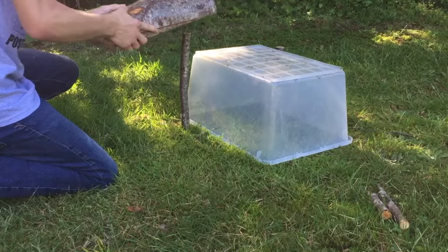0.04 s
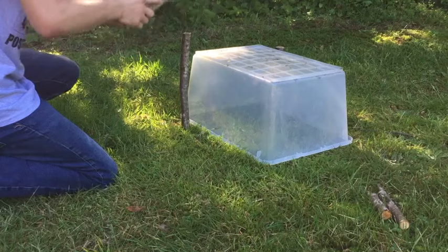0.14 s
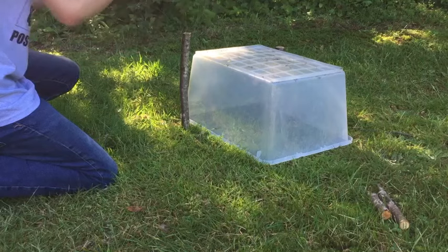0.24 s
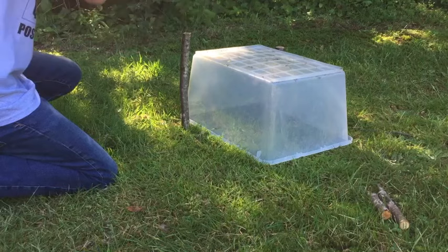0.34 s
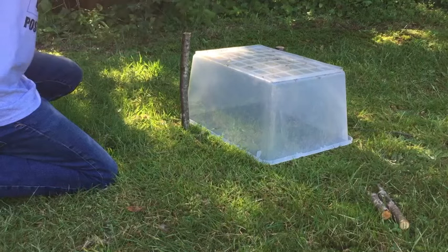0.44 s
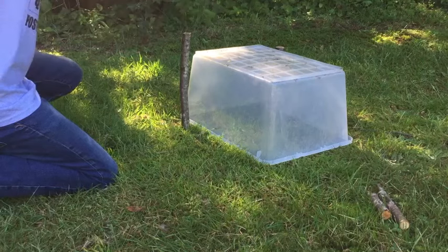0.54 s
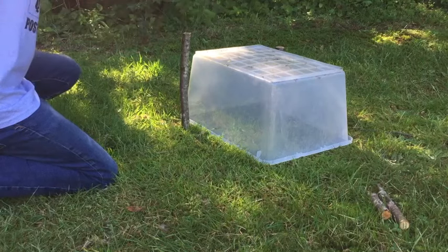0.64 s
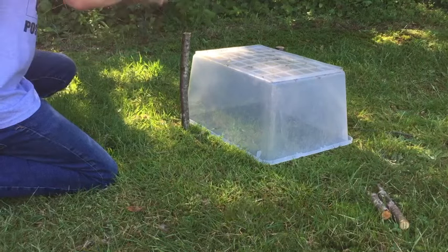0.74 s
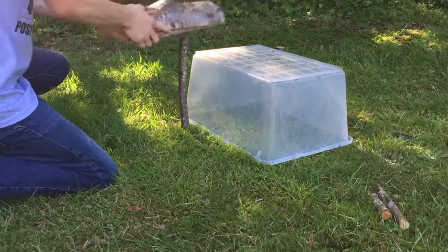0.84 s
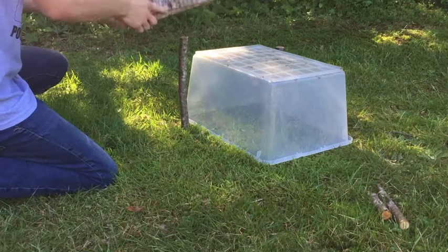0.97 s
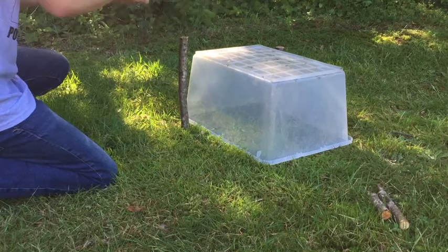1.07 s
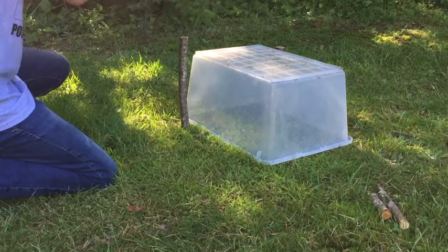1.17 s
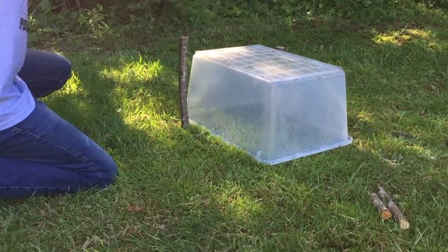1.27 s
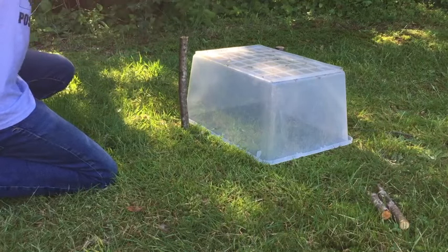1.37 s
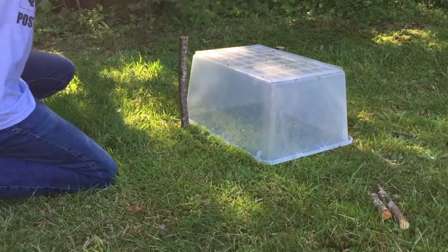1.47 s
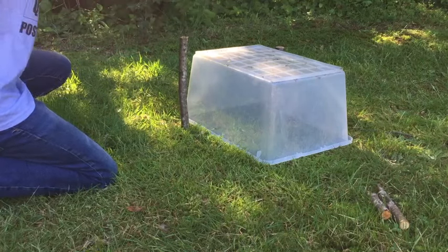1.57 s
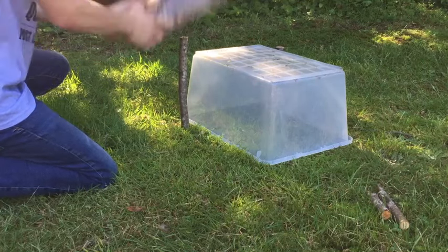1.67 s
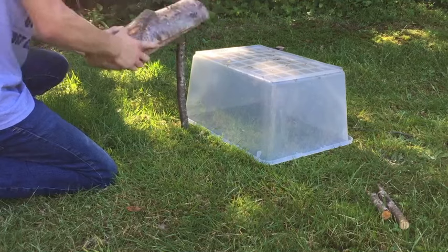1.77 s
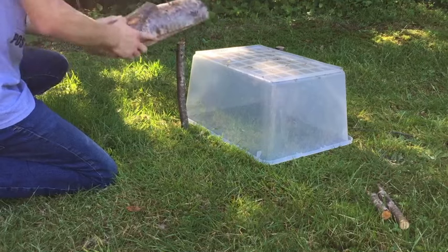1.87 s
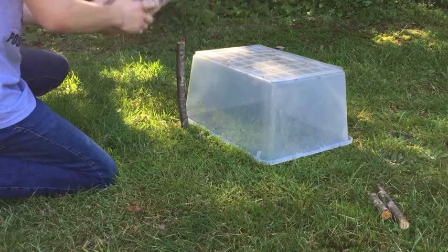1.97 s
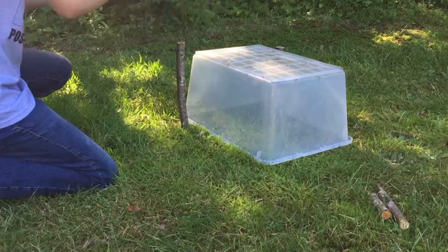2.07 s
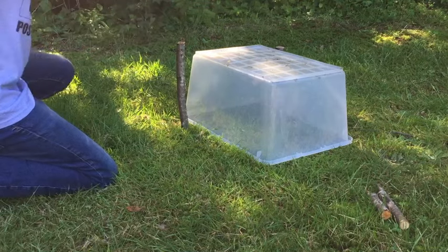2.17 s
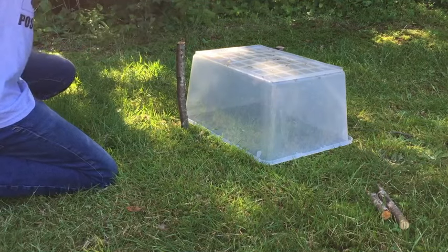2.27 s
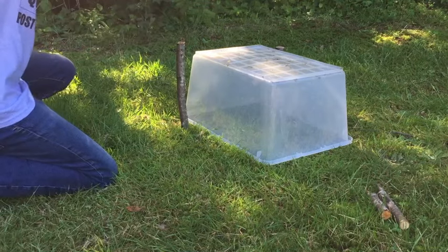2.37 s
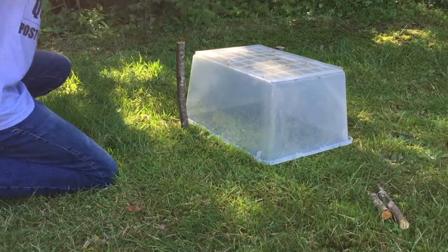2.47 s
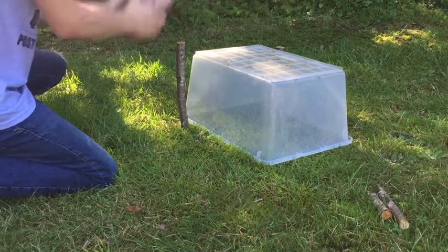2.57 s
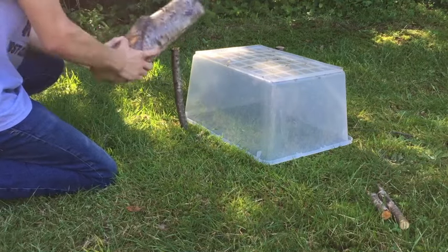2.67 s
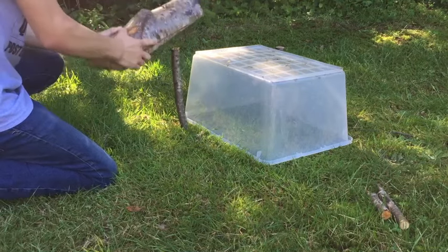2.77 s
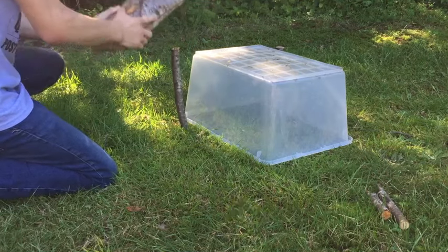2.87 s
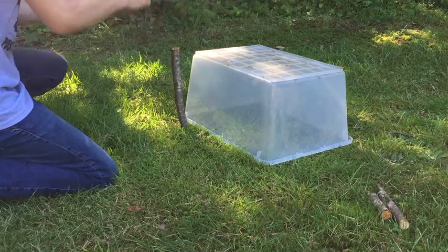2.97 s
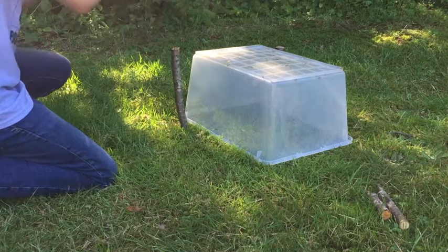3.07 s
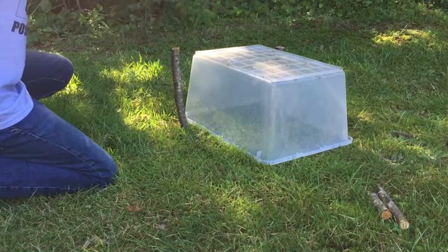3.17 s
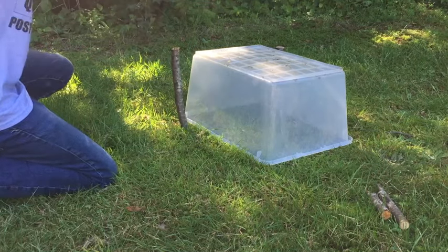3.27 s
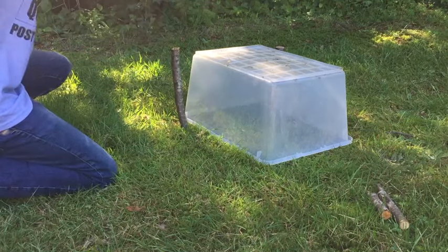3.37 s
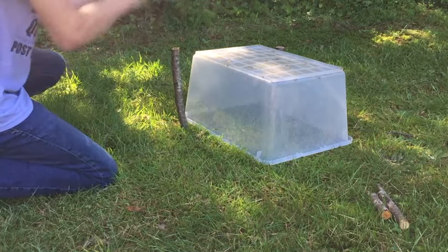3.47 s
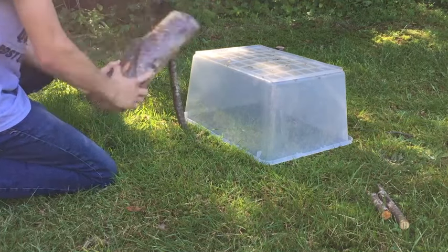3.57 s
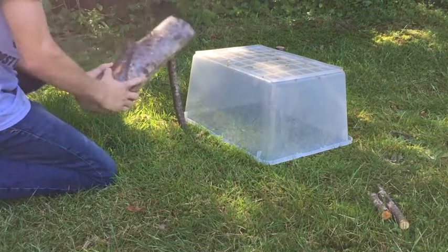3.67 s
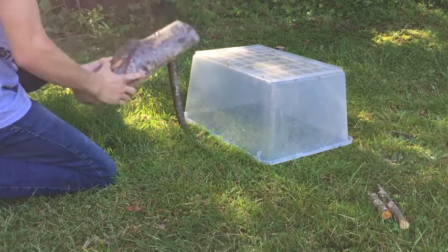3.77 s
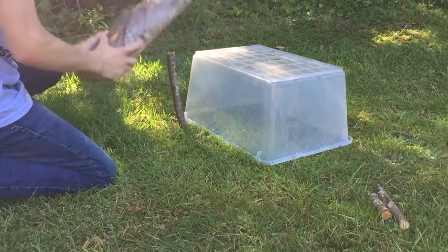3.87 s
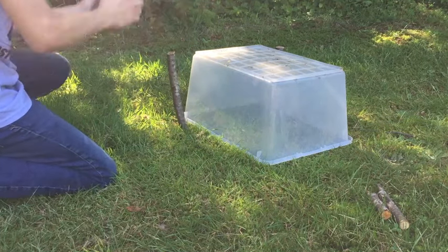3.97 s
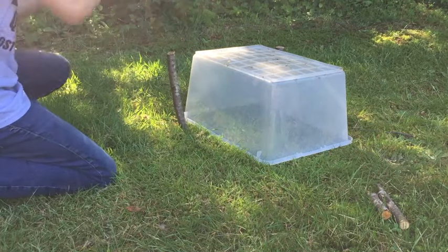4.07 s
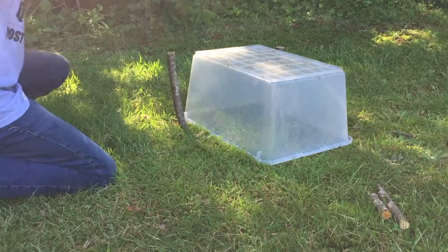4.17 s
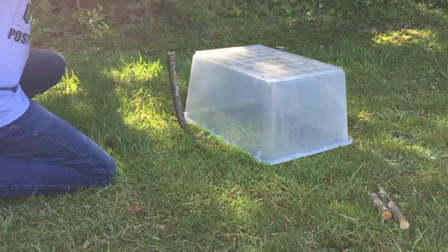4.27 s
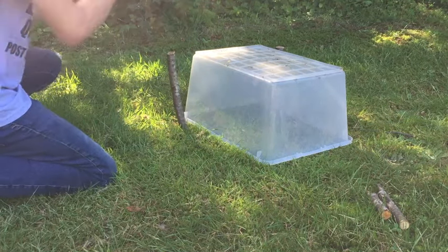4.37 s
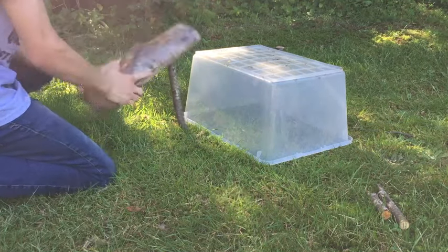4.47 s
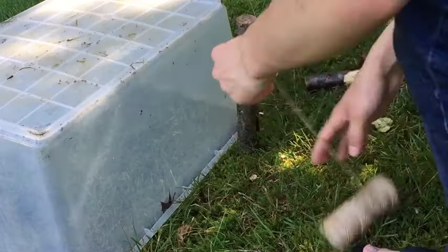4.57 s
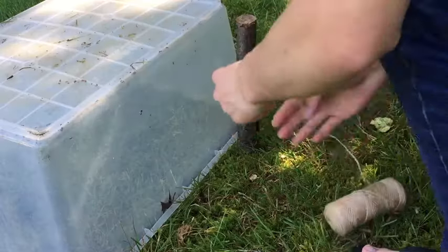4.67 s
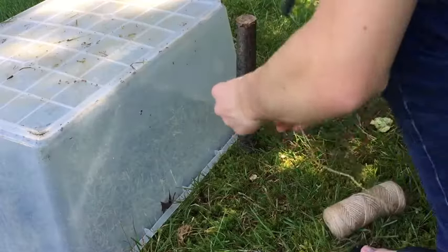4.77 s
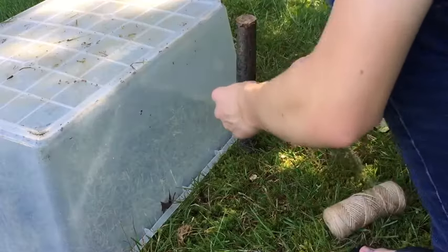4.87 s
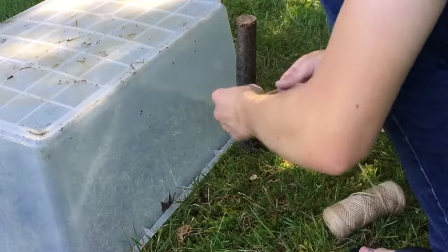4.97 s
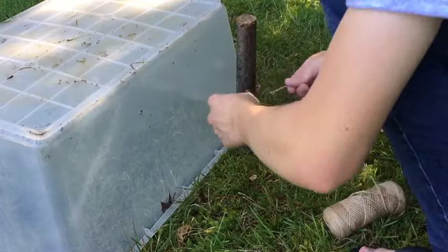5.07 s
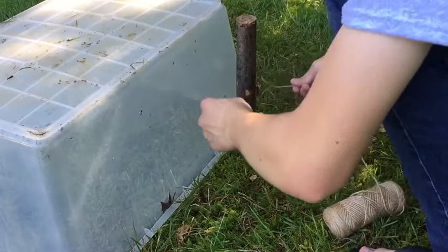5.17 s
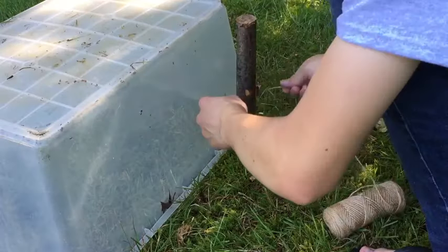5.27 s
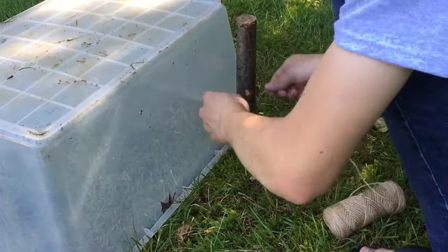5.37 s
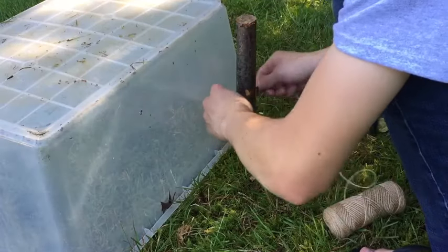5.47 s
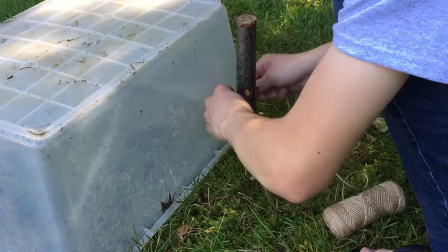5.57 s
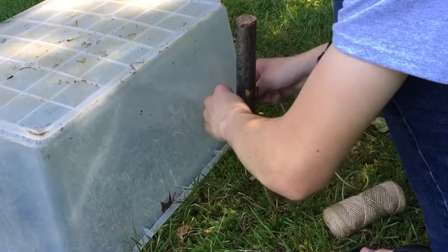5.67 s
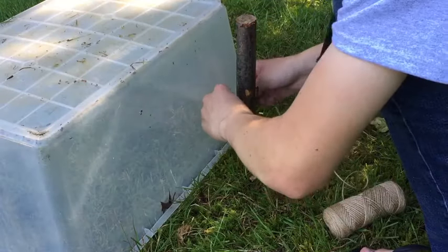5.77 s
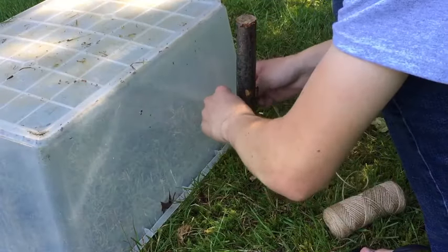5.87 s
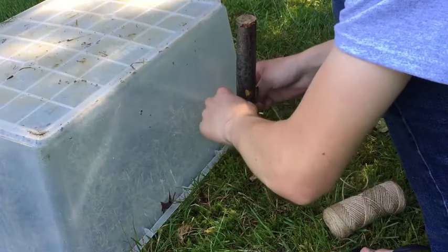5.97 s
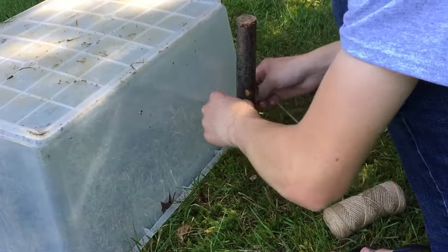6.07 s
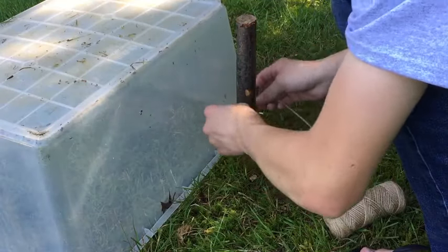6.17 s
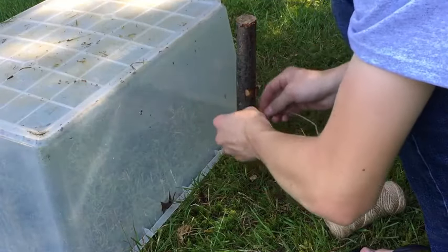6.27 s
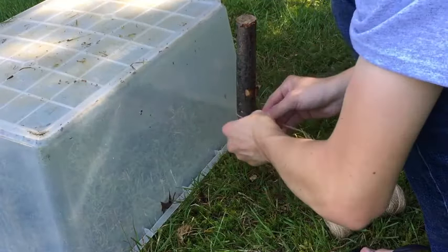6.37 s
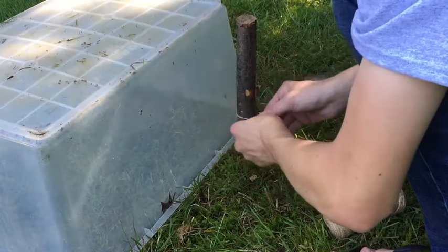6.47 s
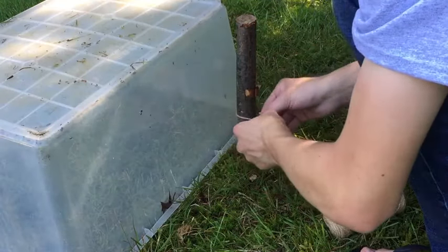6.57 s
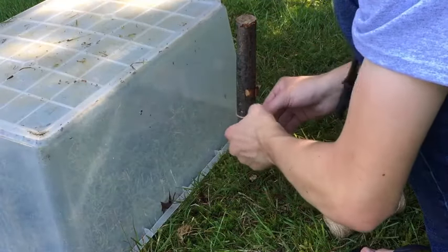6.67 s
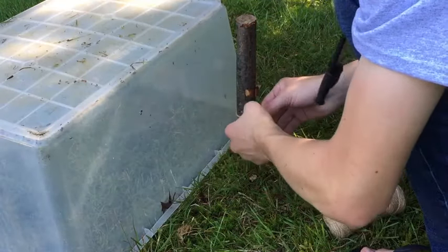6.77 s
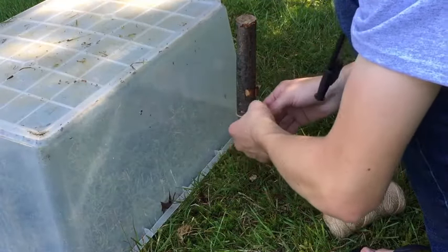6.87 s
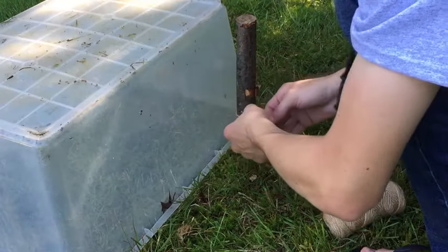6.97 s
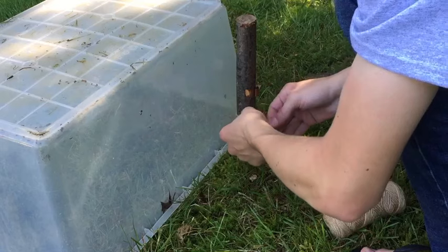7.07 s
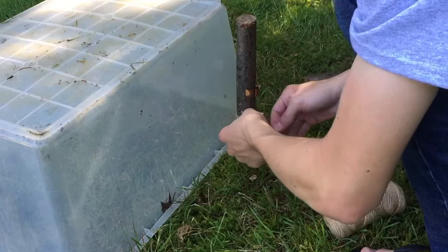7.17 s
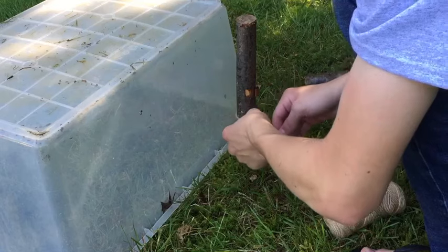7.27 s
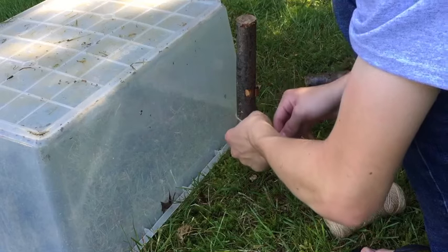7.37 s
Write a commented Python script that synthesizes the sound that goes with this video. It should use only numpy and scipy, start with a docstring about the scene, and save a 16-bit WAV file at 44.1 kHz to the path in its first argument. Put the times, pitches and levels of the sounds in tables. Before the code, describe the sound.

A wooden stake is hammered five times in a garden, each knock with a dull thump, then quiet outdoor air and faint birds.

```python
"""A garden lawn, where five blows of a short log drive a wooden stake in beside an upturned plastic tub.
Each impact excites the damped modes of log and stake; the soil carries the push to the tub, which booms.
Fence, trees and a wall reflect the knocks, and birds whistle over the harmonics of a far engine.
Then the listening point jumps close to the stake, where twine is tied with a few small ticks."""
import sys
import numpy as np
from scipy import signal
from scipy.fft import rfft, irfft
from scipy.io import wavfile
from scipy.ndimage import uniform_filter1d

SR = 44100
rng = np.random.default_rng(int(sys.argv[2]) if len(sys.argv) > 2 else 0)


def store_pcm(level_fs):
    """Save levels as 16-bit WAV."""
    pcm = np.round(np.clip(level_fs, -1, 1) * 32767).astype(np.int16)
    wavfile.write(sys.argv[1], SR, np.atleast_2d(pcm).T)


N = 327663
T = np.arange(N) / SR
AGE = T[:int(.7 * SR)]  # time since the onset of one event
TOP_HZ = 16000


def hammering(soil_lag_s=.0023, sooner_s_per_blow=.00065):
    """Multipath propagation: each blow arrives through the air, through the soil and by reflection."""
    # blows: t/s, force/dB, log pitch f/Hz, log level/dB, contact hardness/dB, echo level/dB
    blows = [(0.8400, -3, 2000, 1.5, -6, -3.5), (1.7406, 0, 1920, 0.5, -6, -.5),
             (2.6587, 0, 1492, 0, 6, -0.5), (3.602, 0.5, 1581, 4.5, -4.5, -1.5),
             (4.5241, 1, 1423, -3.5, 1, -1.5)]
    direct, front, back = np.zeros((3, N))
    for k, (s, force_db, log_hz, log_db, hard_db, echo_db) in enumerate(blows):
        knock = undb(force_db) * blow(log_hz, log_db, hard_db)
        add(direct, s, knock)
        # the push reaches the tub sooner as the stake goes deeper
        add(direct, s + soil_lag_s - k * sooner_s_per_blow, undb(force_db / 2) * tub_thump())
        add(front, s, undb(echo_db) * knock)
        # the far side of the stake radiates less ring and more crack
        thrown = blow(log_hz, log_db - 4.5, hard_db, crack_db=-12.2, tilt_db_per_octave=-1.5)
        add(back, s, undb(force_db + echo_db) * thrown)
    return direct + undb(-5) * garden_echo(front) + undb(-2) * garden_echo(back) + wall_echo(front)


def blow(log_hz, log_db, hard_db, crack_db=-14.7, tilt_db_per_octave=-.5, contact_s=.0008):
    """Impact excitation: one brief contact sets log and stake ringing and crushes the bark."""
    wood = undb(log_db) * log_ring(log_hz, hard_db) + stake_ring(hard_db)
    crack = undb(crack_db) * bark_crack(hard_db, tilt_db_per_octave)
    return undb(2.5) * (wood + crack) * rise(AGE, contact_s)


def log_ring(hz, hard_db):
    """Mode splitting: the log is not quite round, so a close pair lies below its second bending mode."""
    # modes of the log: frequency ratio, level/dB, decay time ratio
    modes = [(1, -7, 1), (.88, -13, .9), (2.76, -27, .7)]
    t60 = max(.021 + .0008 * hard_db, .005)  # a harder contact rings longer
    return ring([(ratio * hz, db, share * t60) for ratio, db, share in modes], scatter=.0055)


def stake_ring(hard_db, middle_db=-2.5):
    """Modal excitation: how squarely the log lands sets the share of the middle and upper modes."""
    # modes of the stake: f/Hz, level/dB, t60/s
    modes = [(273, -13.5, .032), (438, -11, .016), (590, -9.5, .02), (880, -21.5, .028), (1246, -13, .018),
             (1759.5, -21, .015), (2146, -12.5, .018), (2510, -19, 0.018), (2810, -15, 0.014),
             (3234, -18.5, 0.014), (3850, -19, 0.011), (4740, -29.5, .009), (5900, -25, .008)]
    excited = []
    for hz, db, t60 in modes:
        upper, middle = hz > 1400, 750 < hz < 1050
        excited.append((hz, db + upper * hard_db + middle * (hard_db + middle_db), t60))
    return ring(excited)


def bark_crack(hard_db, tilt_db_per_octave, crush_t60=.013, snap_t60=.004):
    """Broadband transient: a snap and crushing bark, louder and brighter for a harder contact."""
    # spectrum of the crack: f/Hz, level/dB
    spectrum = [(300, -13), (1000, -3), (2500, 1), (4000, 3), (5000, -4.5), (6500, -2.5), (9000, -3.5),
                (10500, -12.5), (12500, -5.5), (16000, -17.5)]
    slope = tilt_db_per_octave + .08 * hard_db
    grit = noise([(hz, db + slope * np.log2(hz)) for hz, db in spectrum], len(AGE))
    return undb(.8 * hard_db) * grit * (fade(crush_t60) + undb(3) * fade(snap_t60))


def tub_thump():
    """Ground-borne vibration: the push crosses the soil and sets the tub booming milliseconds later."""
    # modes of soil and tub: f/Hz, level/dB, t60/s, delay/s, rise/s
    modes = [(63.4, -17.6, .13, .0035, .018), (68, -31.5, .47, 0.0052, .035),
             (141, -14, 0.032, .0115, .002), (110, -28, 0.079, 0.0097, 0.0077)]
    out = 0
    for hz, db, t60, delay_s, rise_s in modes:
        t = np.maximum(AGE - delay_s, 0)
        out += undb(db) * rise(t, rise_s) * fade(t60, t) * np.sin(2 * np.pi * hz * t)
    return out


def garden_echo(x, near_rise_s=.011, fence_s=.036, fence_width_s=.012, far_rise_s=.063):
    """Scattering: nearby things answer first, the fence adds a swell, the trees a long faint wash."""
    # echo bands: centre f/Hz, near level/dB, near t60/s, tree level/dB, tree t60/s
    bands = [(201.4, -27.5, 0.23, -41.5, 0.85), (510, -28, 0.11, -39.5, .7), (1400, -25.5, .19, -31, 0.7),
             (2600, -25, .22, -28.5, .9), (5170, -23.5, .28, -33.5, .65), (11014, -23.5, 0.3, -42, .4)]
    centres = np.array(bands)[:, 0]
    edges = np.r_[centres[0] / 2, np.sqrt(centres[1:] * centres[:-1]), TOP_HZ]
    response = 0
    for k, (hz, near_db, near_t60, far_db, far_t60) in enumerate(bands):
        fence = 1 + 1.8 * min(1, 1500 / hz) * np.exp(-((AGE - fence_s) / fence_width_s) ** 2)
        near = fade(near_t60) * rise(AGE, near_rise_s) * fence
        far = fade(far_t60) * rise(AGE, far_rise_s)
        envelope = np.hypot(undb(near_db) * unit_energy(near), undb(far_db) * unit_energy(far))
        response += envelope * band(rng.standard_normal(len(AGE)), edges[k], edges[k + 1], order=3)
    return signal.fftconvolve(x, response)[:N]


def wall_echo(x, delay_s=.103, db=-34.5):
    """Discrete reflection: a distant wall returns one dull slap."""
    out = np.zeros(N)
    add(out, delay_s, undb(db) * band(x, 194, 700))
    return out


def turf_thud():
    """Heavily damped impact: two low modes and a scuff of noise on the turf."""
    # the thud: t/s, level/dB, f/Hz, t60/s, relative scuff level/dB
    thud = (3.770, -29, 168, 0.1, -12)
    s, db, hz, t60, scuff_db = thud
    body = ring([(hz, 0, t60), (1.7 * hz, -12, t60 / 2)])
    scuff = noise([(100, 14), (500, 4), (1700, -8), (6000, -22), (15000, -44)], len(AGE)) * fade(.06)
    out = np.zeros(N)
    add(out, s, undb(db) * (body + undb(scuff_db) * scuff) * rise(AGE, .0037))
    return out


def dry_ticks():
    """Band-limited transients: bark, grass and twine give off short decaying bursts of noise."""
    # ticks: t/s, level/dB, centre f/Hz, t60/s
    ticks = [(2.822, -63, 8900, 0.056), (3.526, -64, 5000, 0.013), (4.757, -49.5, 8100, 0.043),
             (4.856, -58, 4000, .007), (4.866, -64, 3000, .007), (5.024, -63, 6980, .01)]
    out = np.zeros(N)
    for s, db, hz, t60 in ticks:
        grit = band(rng.standard_normal(len(AGE)), hz / 2, hz * 2, order=1)
        add(out, s, undb(db) * grit / grit.std() * fade(t60))
    return out


def birds(trees_t60=.56):
    """Direct-to-reverberant ratio: near calls come through clear, far song is smeared by the trees."""
    near, far = whistles(near_notes(), waver=.02), whistles(far_notes(), waver=.018)
    trees = rng.standard_normal(len(AGE)) * fade(trees_t60) * rise(AGE, .01)
    scattered = signal.fftconvolve(undb(-8) * near + undb(-1) * far, unit_energy(trees))[:N]
    return near + undb(-5) * far + scattered


def near_notes(chirp_period_s=.081, chirp_s=.036, chirp_db=-60, arch_hz=1300, scatter=.012):
    """Pitch contours of the near birds: four arched chirps, each higher than the last, then trills."""
    # trills: t/s, notes, period/s, note length/s, f/Hz, fractional fall in a note, level/dB
    trills = [(1.205, 10, .0455, .02, 4430, 0.07, -74), (1.878, 1, 0, .046, 2890, 0, -56),
              (1.953, 1, 0, .02, 2830, .06, -60), (2.0, 6, 0.021, .01, 7620, 0.03, -75),
              (2.415, 5, 0.021, .01, 7600, .03, -75), (3.234, 3, .06, .016, 7900, .26, -67.5)]
    tops_hz = 7400 + 420 * np.arange(4)
    notes = [(.004 + k * chirp_period_s, chirp_s, (hz - arch_hz, hz, hz - arch_hz), chirp_db)
             for k, hz in enumerate(tops_hz)]
    for s, count, period, length, hz, fall, db in trills:
        slide = hz * np.array([1 + fall / 2, 1, 1 - fall / 2])
        notes += [(s + k * period, length, slide * detune(scatter), db) for k in range(count)]
    return notes


def far_notes(note_s=.05, scatter=.008):
    """Frequency glides from the trees: each phrase is made of a note that slides quickly and settles."""
    # phrases: t/s, notes, period/s, start f/Hz, end f/Hz, level/dB
    phrases = [(0.0, 2, .065, 2800, 3200, -70), (0.0, 1, 0, 1450, 1720, -69),
               (0.16, 2, .085, 6100, 6280, -75), (0.6, 2, .06, 3900, 5400, -75),
               (0.815, 3, .142, 2650, 2590, -60), (0.878, 3, .138, 2600, 3520, -61),
               (1.66, 1, 0, 4770, 4950, -69), (1.89, 1, 0, 3400, 5000, -72),
               (2.92, 2, .11, 2750, 3230, -63), (3.04, 1, 0, 3090, 3950, -66.5),
               (3.77, 2, .07, 5700, 4580, -71), (4.068, 3, .052, 5300, 3780, -66.5),
               (4.24, 1, 0, 2700, 3650, -63), (4.3, 2, .15, 3600, 2680, -60.5),
               (5.53, 3, .075, 5200, 3750, -66.5)]
    notes = []
    for s, count, period, from_hz, to_hz, db in phrases:
        slide = np.array([from_hz, to_hz + .2 * (from_hz - to_hz), to_hz])
        notes += [(s + k * period, note_s, slide * detune(scatter), db) for k in range(count)]
    return notes


def whistles(notes, waver):
    """Frequency and amplitude modulation: each note is a warbling sine bent through three pitches."""
    out, wobble = np.zeros(N), 1 + waver * walk(220)
    for s, length, pitches_hz, db in notes:
        progress = np.linspace(0, 1, int(length * SR))
        contour = np.polyval(np.polyfit([0, .5, 1], pitches_hz, 2), progress)
        hz = contour * wobble[int(s * SR):][:len(progress)]
        envelope = np.sqrt(2 * np.abs(np.sin(np.pi * progress)))
        add(out, s, undb(db) * envelope * np.sin(2 * np.pi * np.cumsum(hz) / SR))
    return out * undb(1.5 * walk(90))


def engine_hum(drift=.0027, sway_db=1.16, fall_db_per_s=2.2):
    """Harmonic series: the partials of a far engine drift together in pitch and slowly grow fainter."""
    # engine harmonics: f/Hz, level/dB
    harmonics = [(75.4, -54.5), (150.8, -63), (226.2, -82), (382, -81.5)]
    phase_per_hz = 2 * np.pi * np.cumsum(1 + drift * walk(2)) / SR
    partials = sum(undb(db + sway_db * walk(2)) * np.sin(hz * phase_per_hz) for hz, db in harmonics)
    return np.sqrt(2) * partials * undb(-fall_db_per_s * T)


def far_drone(db=-91.5, swell_db=8.5, peak_s=6.25, width_s=.35):
    """Narrow-band noise: a faint rush from far off swells once and fades."""
    rush = band(rng.standard_normal(N), 870, 1200)
    swell = np.exp(-((T - peak_s) / width_s) ** 2)
    return rush / rush.std() * undb(db + swell_db * swell)


def lawn_air(db=-61.5):
    """Stationary noise: the steady low rumble of the open air."""
    # ambient spectrum across the lawn: f/Hz, level/dB
    spectrum = [(20, -49.5), (35, -25.5), (55, -8), (80, -4.5), (115, -7.5), (170, -10.5), (250, -23),
                (400, -31), (600, -34), (1500, -36.5), (3000, -38), (5400, -42.5), (9000, -47.5),
                (15000, -52.5)]
    return undb(db) * noise(spectrum, N)


def stake_air(db=-64.2, sway_db=.8):
    """Slowly modulated noise: a quieter rumble that wavers in level."""
    # ambient spectrum beside the stake: f/Hz, level/dB
    spectrum = [(20, -50), (48, -10), (90, 0), (140, -1.5), (210, -14), (340, -22.5), (600, -26.5),
                (1000, -29), (1600, -30.5), (3000, -30.5), (4900, -35.5), (9000, -39.5), (14000, -44),
                (17000, -54)]
    return undb(db + sway_db * walk(4.4)) * noise(spectrum, N)


def ring(modes, scatter=.032):
    """Modal superposition: slightly detuned damped sines (f/Hz, level/dB, t60/s) of alternating sign."""
    return sum((-1) ** k * undb(db) * fade(t60) * np.sin(2 * np.pi * hz * detune(scatter) * AGE)
               for k, (hz, db, t60) in enumerate(modes))


def detune(scatter):
    """Random frequency ratio near 1."""
    return 1 + scatter * rng.standard_normal()


def noise(points, size):
    """Spectral shaping: unit-variance noise following (f/Hz, level/dB) points."""
    hz, db = np.transpose(points)
    bins = np.maximum(np.fft.rfftfreq(size, 1 / SR), 1)
    gain = undb(np.interp(np.log(bins), np.log(hz), db))
    x = irfft(rfft(rng.standard_normal(size)) * gain, size)
    return x / x.std()


def band(x, lo_hz, hi_hz, order=2):
    """Band-pass filter, maximally flat."""
    edges = [lo_hz, min(hi_hz, SR / 2 - 1000)]
    return signal.sosfilt(signal.butter(order, edges, "band", fs=SR, output="sos"), x)


def walk(rate_hz):
    """Random drift with a spread near 1."""
    hold = int(SR / rate_hz)
    return uniform_filter1d(np.repeat(rng.standard_normal(N // hold + 1), hold), hold)[:N]


def rise(t, length):
    """Raised-cosine step from 0 to 1."""
    return np.sin(np.pi / 2 * np.clip(t / length, 0, 1)) ** 2


def fade(t60, t=AGE):
    """Exponential decay, 60 dB down after t60."""
    return np.exp(-np.log(1000) * t / t60)


def undb(db):
    """Decibels to amplitude ratio."""
    return 10 ** (np.asarray(db) / 20)


def unit_energy(x):
    """Normalisation: the squares sum to 1."""
    return x / np.linalg.norm(x)


def add(out, s, sound):
    """Superposition: mix a sound in at time s."""
    start = max(int(s * SR), 0)
    out[start:start + len(sound)] += sound[:N - start]


def scene(jump_s=4.608, bird_pause_s=.5):
    """Superposition at two listening points: across the lawn, then the quiet spot beside the stake."""
    jump = rise(T - jump_s, .0023)
    song = birds()
    wide = hammering() + song + engine_hum() + lawn_air()
    close = song * rise(T - jump_s - bird_pause_s, .1) + far_drone() + stake_air()
    return (wide * (1 - jump) + close * jump + turf_thud() + dry_ticks())[None]


def record(dry, ceiling=.51, low_cut_hz=37):
    """Saturation and band limiting: the microphone rounds each peak; deep bass and the top are cut."""
    rounded = dry / (1 + (dry / ceiling) ** 6) ** (1 / 6)
    thinned = signal.sosfilt(signal.butter(2, low_cut_hz, "high", fs=SR, output="sos"), rounded)
    return signal.sosfilt(signal.ellip(8, .2, 70, TOP_HZ, fs=SR, output="sos"), thinned)


dry = scene()
out = record(dry)
store_pcm(out)
```